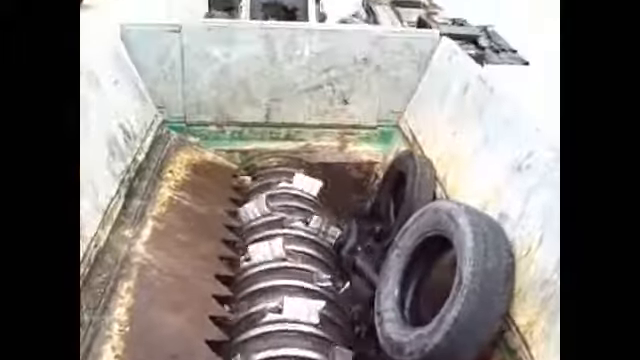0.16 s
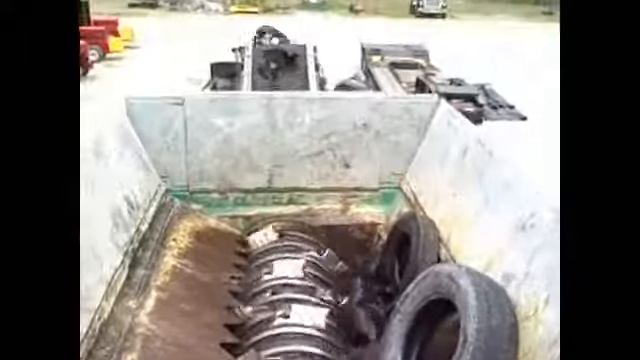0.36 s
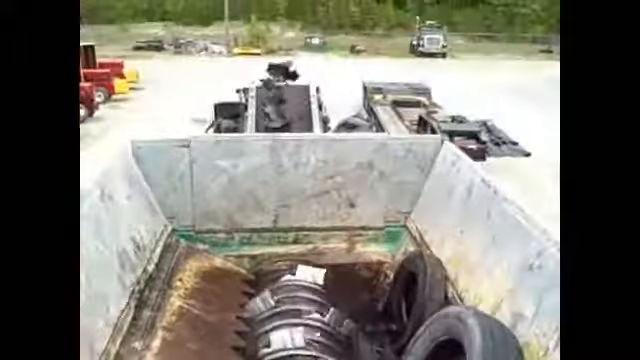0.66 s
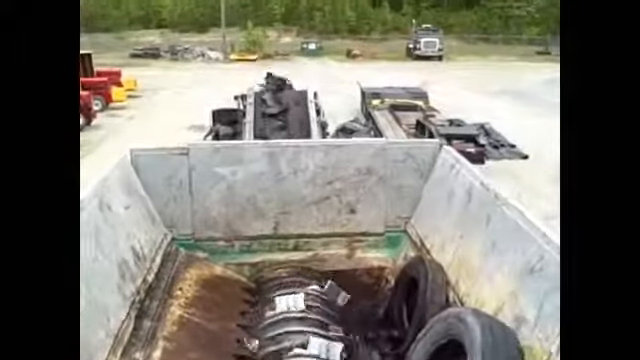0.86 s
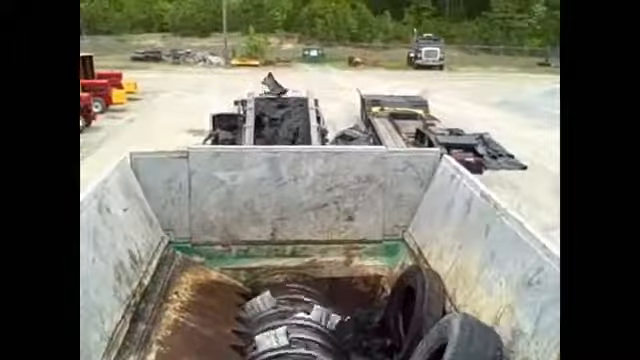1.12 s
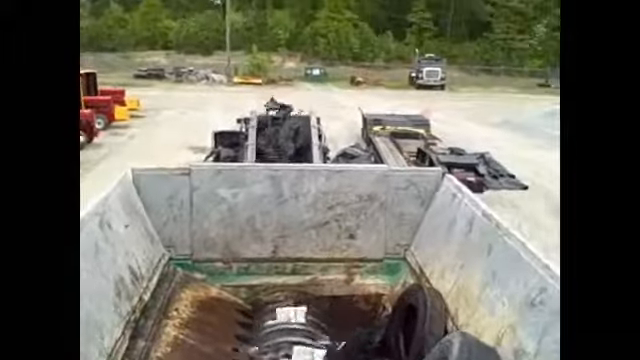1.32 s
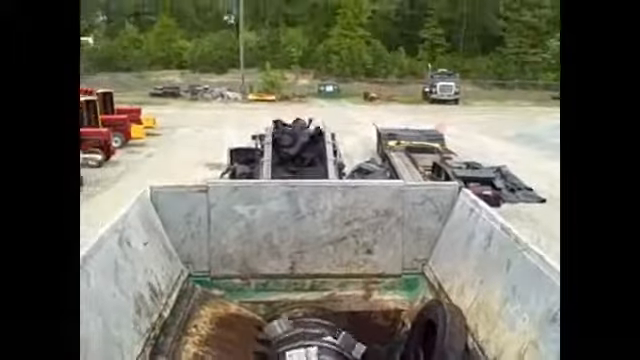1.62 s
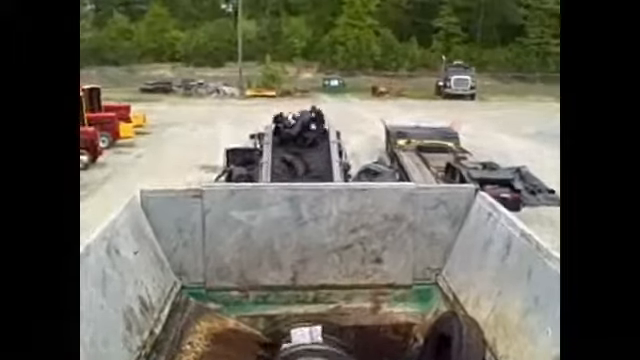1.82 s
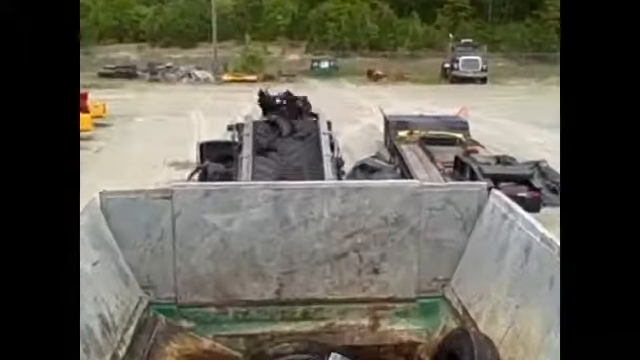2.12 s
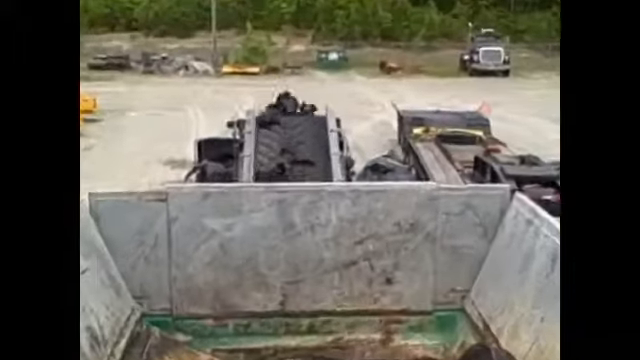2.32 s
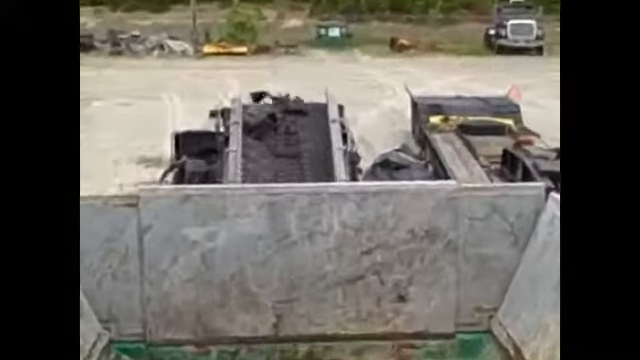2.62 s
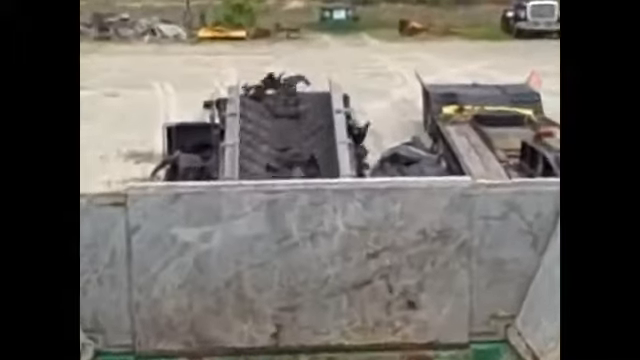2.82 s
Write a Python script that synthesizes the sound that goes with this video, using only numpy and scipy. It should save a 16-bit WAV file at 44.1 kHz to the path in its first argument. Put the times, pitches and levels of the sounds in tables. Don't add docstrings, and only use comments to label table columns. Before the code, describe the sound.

Industrial tyre shredder rumbling with a low diesel hum, ripping rubber and thudding against its steel hopper

```python
import sys
import numpy as np
from scipy import signal
from scipy.io import wavfile
from scipy.ndimage import uniform_filter1d

SR = 44100
rng = np.random.default_rng(int(sys.argv[2]) if len(sys.argv) > 2 else 0)


def transcribe(u):
    v = np.clip(np.atleast_2d(u).T, -1, 1)
    q = np.round(v * 32767).astype(np.int16)
    wavfile.write(sys.argv[1], SR, q)


def invert_db(level):
    return 10 ** (np.asarray(level, dtype=float) / 20)


N = 130977

# pitch in Hz, width in Hz, level in the steady hum in dB.
HOPPER_WALLS = [(122, 15, -8), (161, 13, -3), (191.4, 33, -0.5), (280, 23, 0), (318, 45.4, 5),
                (372, 78, -10), (424, 59, -7), (539, 18, -14.5), (671, 29, -10), (842, 59, -7.5),
                (1223, 14, -13.5)]


def rms_one(x):
    return x / np.sqrt(np.mean(x ** 2) + 1e-20)


def in_time(rows):
    s, *columns = np.transpose(rows)
    return [np.interp(np.arange(N) / SR, s, column) for column in columns]


def drift(rate_hz):
    r = np.exp(-2 * np.pi * rate_hz * 40 / SR)
    noise = rng.standard_normal(N // 40 + 2002)
    slow = signal.lfilter([1], [1, -2 * r, r * r], noise)[2000:]
    return np.interp(np.arange(N) / 40, np.arange(len(slow)), rms_one(slow - slow.mean()))


def resonate(x, hz, width_hz):
    r = np.exp(-np.pi * width_hz / SR)
    zeros = np.array([1, 0, -1]) * (1 - r * r) / 2
    poles = [1, -2 * r * np.cos(2 * np.pi * hz / SR), r * r]
    return signal.lfilter(zeros, poles, x + 1e-18)


def bands(x, low_hz, count):
    for k in range(count):
        low = low_hz * 2 ** (k / 2)
        sos = signal.butter(2, [low, low * np.sqrt(2)], "band", fs=SR, output="sos")
        yield low * 2 ** .25, signal.sosfilt(sos, x[k % 2])


def burst(start_s, length_s, rise):
    t = np.maximum(np.arange(N) / SR - start_s, 0) / max(length_s, .002)
    return (1 - np.exp(-t / max(rise, .01))) * np.exp(-t)


def roar():
    # frequency in Hz, density in dB per Hz.
    colour = [(25, -14), (60, -9.5), (300, -11), (600, -17.5), (1100, -24), (3000, -35.5), (7500, -54),
              (15000, -48)]
    # time in seconds, level in dB.
    rotor_load = [
        (0.0, -20),
        (0.32, -23),
        (0.68, -19.5),
        (0.82, -21.5),
        (1.71, -21),
        (1.83, -22),
        (2.4, -20.5),
        (2.6, -20.5),
        (2.77, -21),
        (2.97, -19.5),
    ]
    load, = in_time(rotor_load)
    load = load - load.mean()
    colour_hz, colour_db = np.transpose(colour)
    shared = 0.6 * drift(9.3)
    hiss_load = 0.3 * load - 2 * np.arange(N) / SR
    air = 0
    for hz, band in bands(rng.standard_normal((2, N)), 22.19, count=19):
        db = np.interp(np.log(hz), np.log(colour_hz), colour_db) + shared + 1.62 * drift(8.5)
        air = air + invert_db(db + (load if hz < 5000 else hiss_load)) * band
    walls = 0
    for hz, width_hz, db in HOPPER_WALLS:
        hum = rms_one(resonate(rng.standard_normal(N), hz, width_hz))
        walls = walls + invert_db(db + 1.66 * drift(3.3)) * hum
    return invert_db(-23) * rms_one(air) + invert_db(-25 + load) * rms_one(walls)


def pump():
    # time in seconds, pitch in Hz, level in dB.
    whine = [(0, 727, -33), (.2, 714, -34.5), (.33, 705, -37), (.52, 729, -36), (.68, 708, -34),
             (.9, 724, -34), (1.05, 731, -30.5), (1.18, 703, -32), (1.31, 726, -31), (1.46, 719, -31.5),
             (1.63, 730, -29.5), (1.8, 707, -31), (1.97, 725, -31), (2.14, 718, -28.5), (2.22, 716, -38),
             (2.4, 729, -32), (2.62, 710, -34), (2.82, 728, -32)]
    # multiple of the pitch, wander in Hz, level in dB re whine, follows load from 0 to 1.
    whine_tones = [(.5, 1.0, 0.5, 0), (1, 1.0, 0, 1)]
    inertia_s, flutter_db = .06, 1.0
    hz, db = in_time(whine)
    hz = uniform_filter1d(hz, size=int(inertia_s * SR))
    out = 0
    for multiple, wander_hz, tone_db, follows in whine_tones:
        turn = 2 * np.pi * np.cumsum(multiple * hz + wander_hz * drift(9.3)) / SR
        level_db = tone_db + db.mean() + follows * (db - db.mean()) + flutter_db * drift(25.0)
        out = out + np.sqrt(2) * invert_db(level_db) * np.sin(turn)
    return out


def exhaust():
    # time in seconds, firing rate in Hz, hum level in dB.
    firing = [(0, 99.2, -20), (.12, 106.3, -22.5), (.26, 100.4, -16.5), (.4, 104.6, -21), (.52, 104.5, -22),
              (.65, 107.5, -19.5), (.76, 102.4, -18), (.95, 105.8, -21), (1.17, 101.6, -17.5),
              (1.32, 105.4, -19.5), (1.6, 105, -21), (1.79, 102.4, -16.5), (1.97, 105.7, -19.5),
              (2.17, 102.6, -18), (2.39, 107.1, -19), (2.56, 104, -16), (2.72, 106.6, -21.5),
              (2.97, 106.1, -17.5)]
    # multiple of the firing rate, level in dB re hum.
    orders = [(.5, -21), (1.5, -18), (3.0, -30.5)]
    hz, db = in_time(firing)
    turn = 2 * np.pi * np.cumsum(hz) / SR
    tone = np.sin(turn + 1.0)
    for multiple, order_db in orders:
        tone = tone + invert_db(order_db + 1.2 * drift(0.97)) * np.sin(multiple * turn)
    return np.sqrt(2) * invert_db(db + 1.15 * drift(6.3)) * tone


def clinks():
    clinks_per_s, level_db, ring_cycles = 500, -41, 18
    struck = rng.random(N) < clinks_per_s * invert_db(3.0 * drift(8)) / SR
    sizes = invert_db(1.5 * np.minimum(rng.exponential(1, N), 4)) * rng.choice([-1, 1], N) * struck
    dealt = rng.integers(0, 24, N)
    rings = 0
    for k, hz in enumerate(np.geomspace(1300, 5500, 24)):
        ring = resonate(sizes * (dealt == k), hz, 3.4 * hz / ring_cycles)
        rings = rings + ring * invert_db(-7.0 * np.log2(hz / 2000))
    return invert_db(level_db) * rms_one(rings)


def squeaks():
    # start in seconds, level in dB, length in seconds, pitch in Hz.
    slips = [(0.21, -37, .015, 2400), (0.283, -36, .015, 2820), (0.615, -33, 0.014, 2300),
             (1.243, -28.5, 0.013, 1505), (1.315, -32, 0.011, 2090), (1.59, -37, .018, 1860),
             (1.936, -36.5, 0.0097, 2100), (1.964, -33, 0.008, 2320), (2.003, -36, 0.0071, 2520),
             (2.312, -33, 0.0085, 2780), (2.707, -32.5, 0.023, 2400), (2.332, -39, 0.011, 2460)]
    width_hz = 340
    noise = rng.standard_normal(N)
    out = 0
    for s, db, length, hz in slips:
        rasp = resonate(resonate(noise, hz, width_hz), hz, 2 * width_hz)
        out = out + invert_db(db + 9) * burst(s, length, 0.44) * rms_one(rasp)
    return out


def pings():
    # start in seconds, level in dB, pitch in Hz, time to fall 60 dB in seconds.
    strikes = [(.662, -27, 114, 0.068), (.704, -18, 328, .06), (0.711, -10.5, 151, .07),
               (0.723, -16, 317, 0.055), (.738, -26, 856, 0.045), (1.929, -14.5, 343, 0.079),
               (2.158, -19, 170, 0.055), (2.48, -19, 200, .08), (2.617, -39, 3500, 0.036),
               (2.736, -39, 5065, 0.051), (2.776, -33, 3230, .04), (2.92, -43, 5900, .05)]
    t = np.arange(N) / SR
    out = 0
    for s, db, hz, t60 in strikes:
        out = out + invert_db(db) * 3 * burst(s, t60 / np.log(1000), 0.74) * np.sin(2 * np.pi * hz * (t - s))
    return out


def snaps():
    # start in seconds, level in dB, ring pitch in Hz.
    breaks = [(.619, -28, 7000), (.631, -36, 6000), (0.658, -34, 3500), (.7115, -34, 11000),
              (0.737, -31, 8800), (0.776, -38, 12000), (1.0395, -39, 5220), (1.339, -44, 8000),
              (1.3435, -31, 4100), (1.349, -37, 6500), (1.358, -15.5, 2460), (1.408, -34, 6800),
              (1.6011, -29, 4180), (1.7796, -39, 9000), (1.9366, -25, 2200), (2.027, -34, 4200),
              (2.143, -39, 5000), (2.32, -28, 6960), (2.494, -41, 6840), (2.529, -33, 6060),
              (2.5371, -34, 5500), (2.6733, -35, 11000), (2.6922, -14, 4560), (2.6945, -34, 6300),
              (2.8989, -37, 4440), (2.9635, -10, 1826)]
    out = 0
    for s, db, hz in breaks:
        crack = rng.standard_normal(N) * burst(s, 0.0043, 0.13)
        ring = resonate(crack, hz, 440.0) * 1.2 + resonate(crack, hz * 1.2, 660.0) * 1.3
        body = invert_db(-37) * resonate(crack, hz * 0.44, hz * 0.69)
        edge = invert_db(-15) * hz / 4000 * np.diff(crack, prepend=0)
        out = out + invert_db(db) * (ring + body + edge)
    return out


def thuds():
    # start in seconds, level in dB, contact in seconds, centre in Hz.
    blows = [(0.081, -38, 0.013, 300), (0.213, -12.5, 0.0046, 280), (.30, -9, 0.016, 270),
             (.654, -14.5, 0.013, 122), (0.669, -14, 0.024, 372), (0.685, -16, 0.0096, 400),
             (.705, -20, 0.0089, 842), (.709, -15, 0.0068, 143), (0.721, -12, 0.011, 318),
             (0.734, -19, 0.0136, 825), (.74, -22, 0.0115, 424), (0.785, -11, .01, 318),
             (1.014, -10, 0.013, 255), (1.115, -21, 0.013, 140), (1.389, -11.5, 0.0091, 197),
             (1.666, -11, 0.023, 188.4), (1.925, -14, 0.013, 393), (1.934, -6, 0.0051, 203),
             (2.146, -20, 0.0052, 840), (2.15, -13, 0.018, 201), (2.39, -7, 0.027, 237.4),
             (2.469, -13.5, 0.038, 295.3), (2.532, -12, 0.02, 280), (2.58, -13.5, .025, 190),
             (2.711, -7, 0.024, 155), (2.801, -18.5, 0.018, 302)]
    level_db, fall_db_per_octave, kick = -2.5, 22, 5.4
    start, blow_db, contact, centre_hz = np.transpose(blows)
    noise = rng.standard_normal(N)
    shapes = np.array([burst(s, length, 0.18) for s, length in zip(start, contact)])
    kick_at = ((start + 0.3027 * contact) * SR).astype(int)
    out = 0
    for k, (hz, width_hz, _) in enumerate(HOPPER_WALLS):
        gain = invert_db(blow_db - fall_db_per_octave * abs(np.log2(hz / centre_hz)))
        force = 0.67 * noise * (gain @ shapes)
        force[kick_at] += kick * gain
        out = out + resonate(force, hz, width_hz) * np.sqrt(SR / width_hz) * (-1) ** k
    return invert_db(level_db) * out


def rips():
    # start in seconds, level in dB, length in seconds, centre in Hz.
    tears = [(0.074, -25, 0.018, 2040), (0.183, -28.5, 0.062, 3520), (0.282, -24, 0.04, 2580),
             (0.59, -24.5, 0.027, 2500), (.657, -19, 0.0074, 2980), (0.677, -22, 0.073, 2200),
             (0.71, -18, 0.018, 2440), (0.863, -21.5, 0.0054, 2500), (1.038, -23, 0.04, 2500),
             (1.059, -26.5, 0.013, 3495), (1.145, -34, 0.018, 4980), (1.248, -42, 0.012, 1470),
             (1.305, -22, 0.037, 2546), (1.337, -23, 0.015, 4820), (1.397, -28, 0.007, 6000),
             (1.408, -23, 0.027, 2580), (1.585, -22, 0.022, 2160), (1.674, -27, 0.025, 4220),
             (1.862, -34, 0.035, 5030), (1.93, -21.5, .012, 3025), (2.007, -27, 0.029, 4200),
             (2.137, -26, 0.011, 3480), (2.32, -25, 0.0093, 3480), (2.426, -22, 0.025, 2447),
             (2.488, -29, 0.024, 7076), (2.517, -22, 0.024, 3340), (2.58, -50, .04, 10000),
             (2.675, -21, 0.019, 4100), (2.77, -44, 0.008, 3007), (2.836, -23.5, 0.022, 2880),
             (2.899, -24, 0.017, 4400), (2.92, -37, 0.015, 5900)]
    level_db, rise, grains_per_s, spread_db, fall_db_per_octave = -5, 0.57, 4500, 4.5, 9
    sizes = invert_db(spread_db * np.minimum(rng.exponential(1, (2, N)), 4)) * rng.choice([-1, 1], (2, N))
    torn = rng.random((2, N)) < grains_per_s / SR
    grains = rms_one(sizes * torn + 0.5 * rng.standard_normal((2, N)))
    start, tear_db, lengths, centre_hz = np.transpose(tears)
    powers = np.array([burst(s, length, rise) for s, length in zip(start, lengths)]) ** 2
    out = 0
    for hz, band in bands(grains, 515.0, count=10):
        db = tear_db + level_db - np.maximum(fall_db_per_octave * np.log2(hz / centre_hz), 0)
        out = out + np.sqrt(invert_db(2 * db) @ powers) * rms_one(band)
    return out


def scene():
    machine = roar() + pump() + exhaust()
    debris = clinks() + squeaks() + pings() + snaps()
    return (machine + debris + thuds() + rips())[None]


def low_pass(x):
    return signal.sosfilt(signal.butter(12, 14970, fs=SR, output="sos"), x)


def record(dry):
    limit = .55
    mix = dry / (1 + (dry / limit) ** 4) ** .25
    return low_pass(mix)


dry = scene()
out = record(dry)
transcribe(out)
```